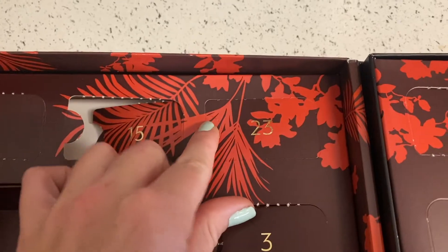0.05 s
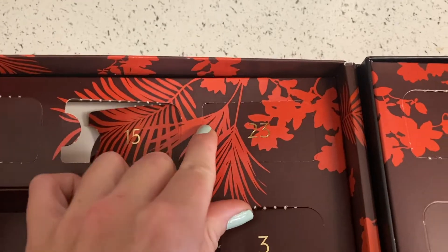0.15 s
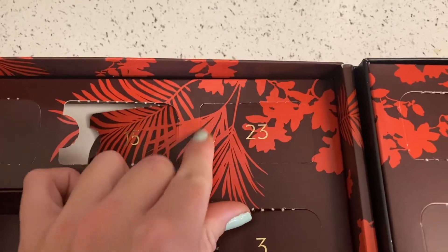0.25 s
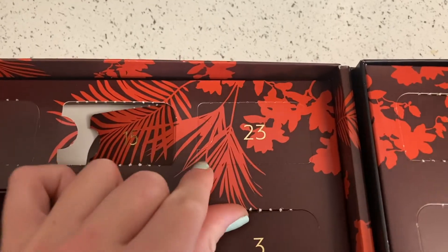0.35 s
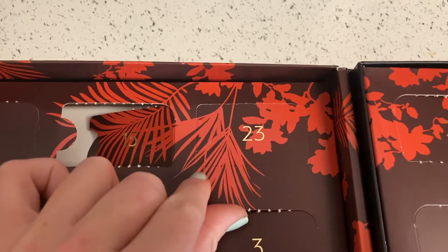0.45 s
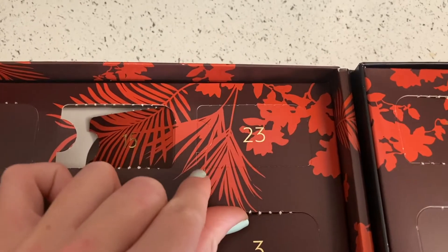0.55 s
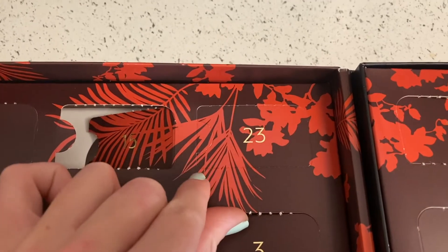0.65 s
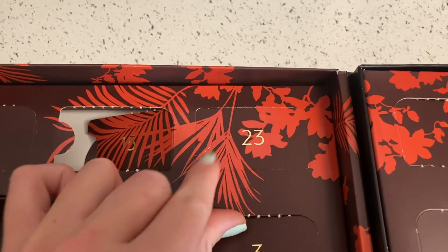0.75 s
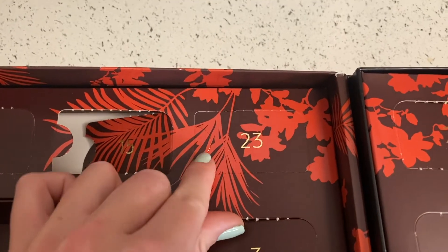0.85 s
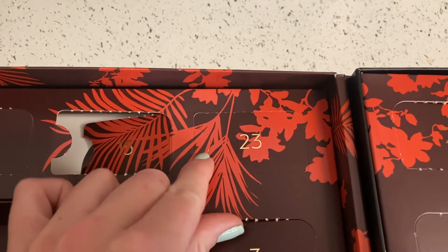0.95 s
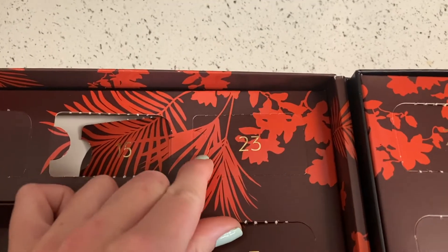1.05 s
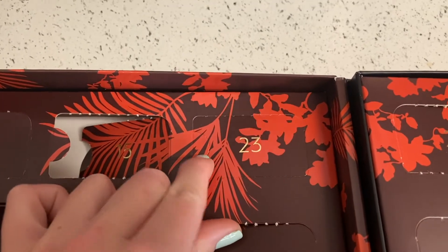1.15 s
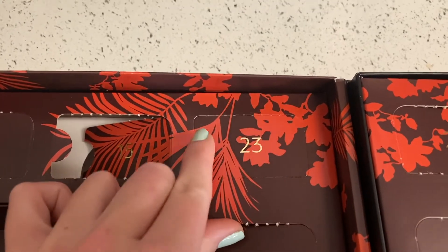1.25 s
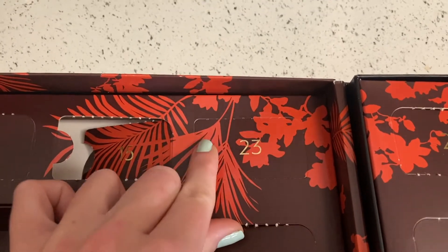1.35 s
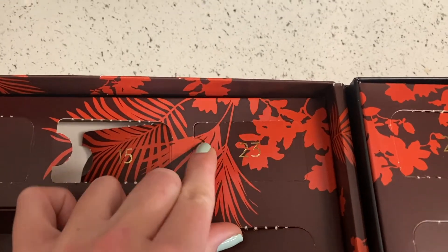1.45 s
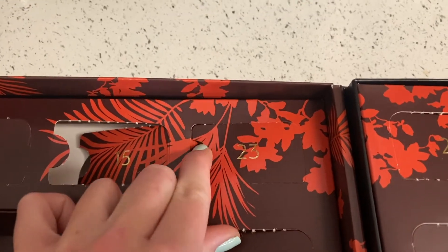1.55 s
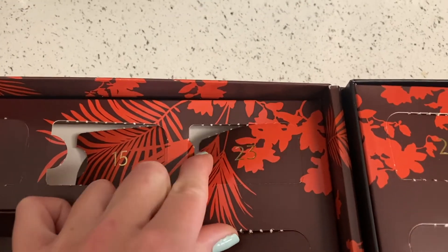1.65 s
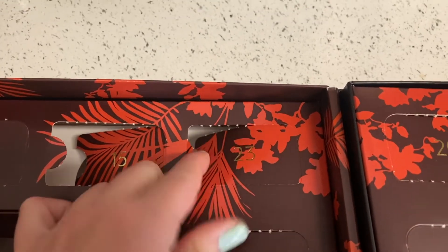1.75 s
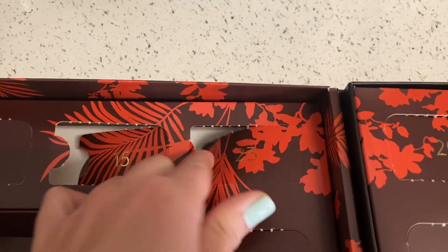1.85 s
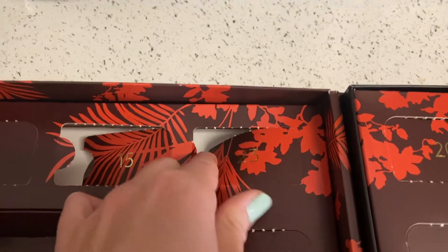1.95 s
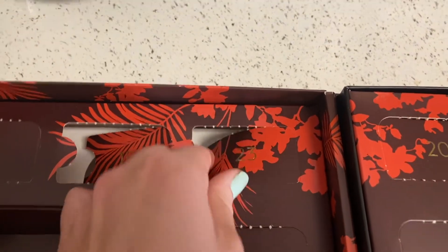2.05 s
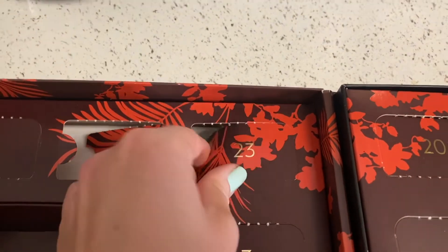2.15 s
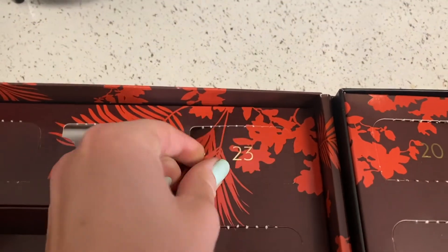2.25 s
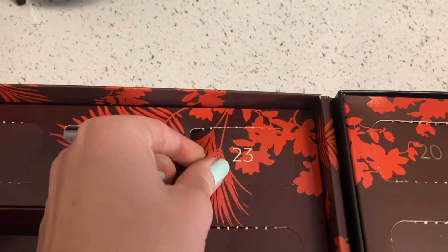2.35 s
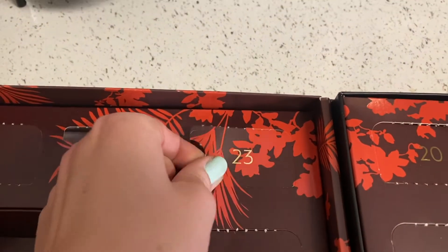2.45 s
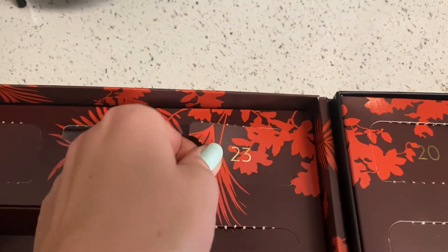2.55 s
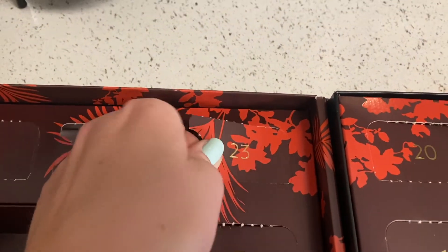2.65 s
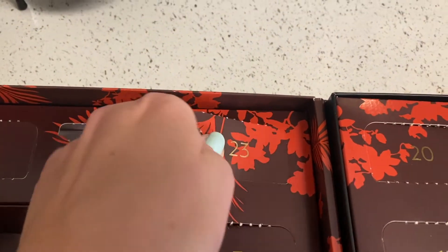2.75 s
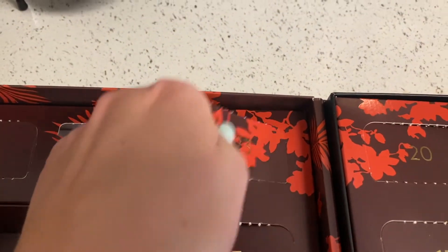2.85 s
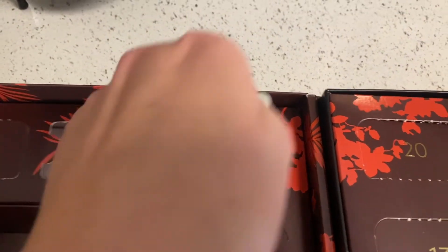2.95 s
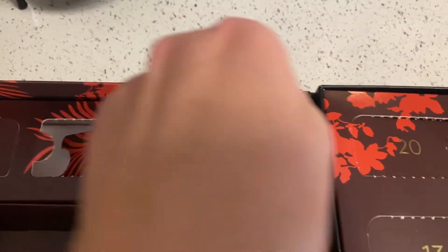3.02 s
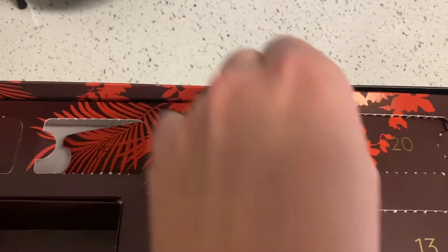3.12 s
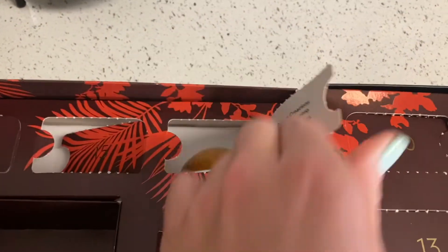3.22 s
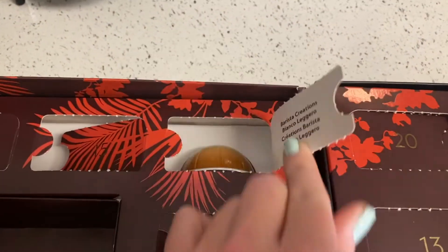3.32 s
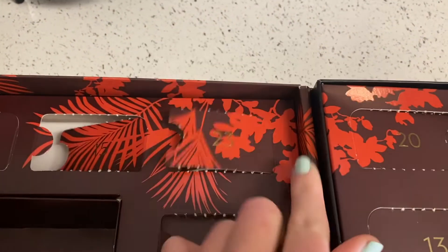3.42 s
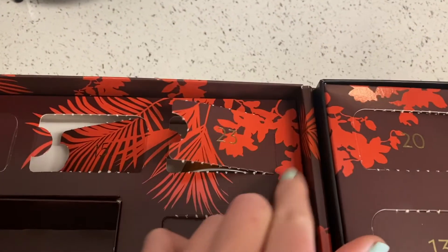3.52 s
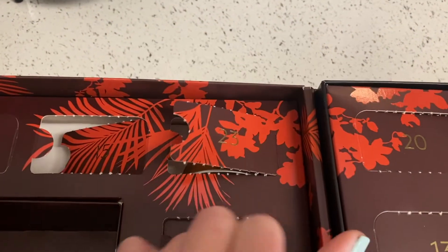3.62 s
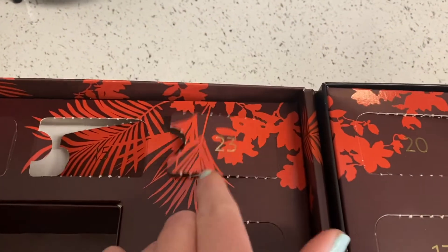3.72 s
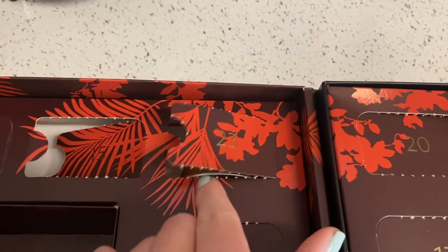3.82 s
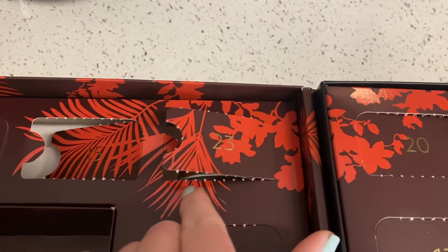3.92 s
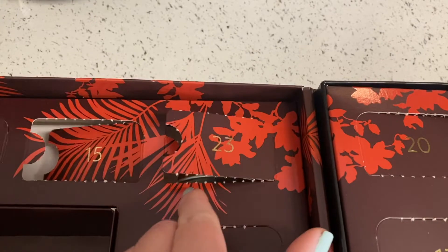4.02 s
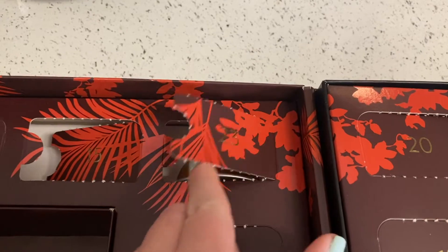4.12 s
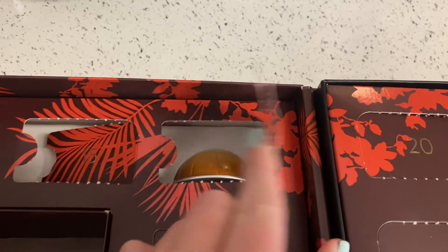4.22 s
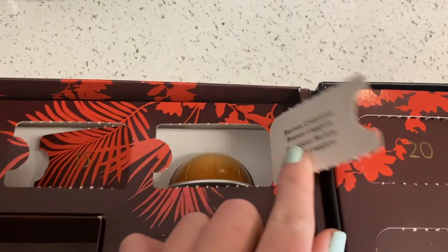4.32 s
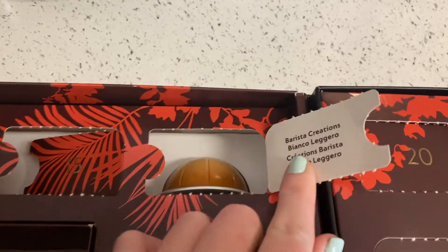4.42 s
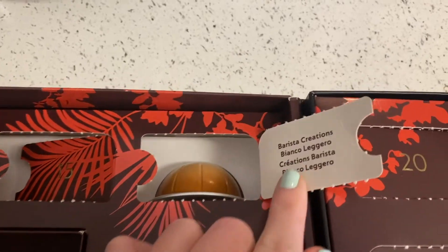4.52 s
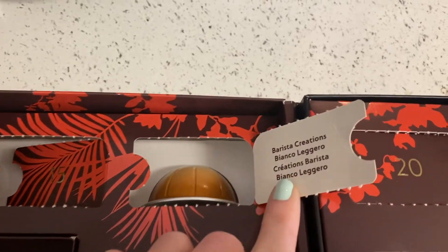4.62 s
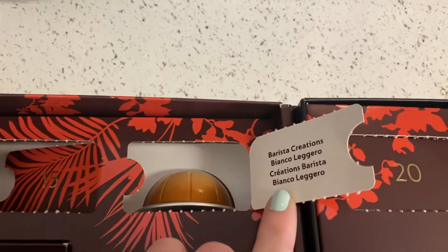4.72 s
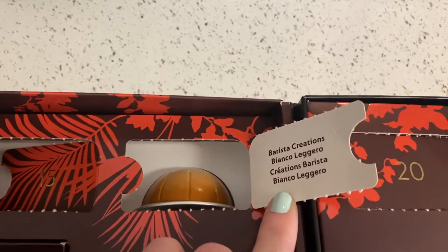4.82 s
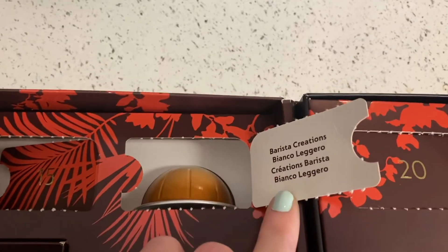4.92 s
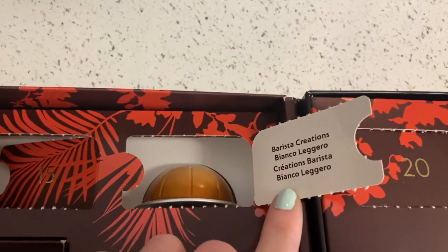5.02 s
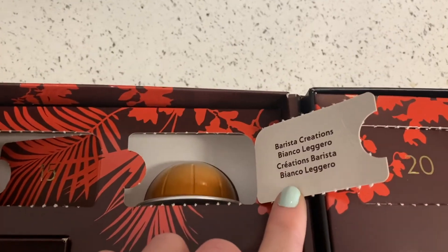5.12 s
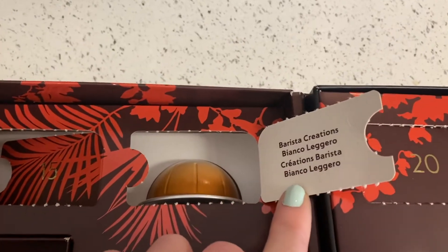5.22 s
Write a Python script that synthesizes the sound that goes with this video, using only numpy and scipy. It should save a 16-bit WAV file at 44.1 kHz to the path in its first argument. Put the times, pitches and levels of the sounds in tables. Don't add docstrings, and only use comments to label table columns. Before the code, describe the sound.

A close stereo phone microphone hears a finger working on a hollow cardboard box on a kitchen counter, over steady soft room air and low fridge hum. From 0 to 1.3 seconds the finger probes: faint skin rub, tiny ticks and muted taps, clearer near 0.2 and 0.8. Around 1.4 and 1.55 the corner is pushed in with bright, sharp cracks and scratchy fibres. Small creaks and crackles continue until 2.4, when the first bridge snaps loudly. More snaps at 2.57 and 2.7 lead into a dense rip from 2.78 to 2.9, dry, boxy and overloaded, with low thumps of the box. A duller knock follows at 3.05. Then the loose flap creaks and scrapes, with a brief high nail squeak near 3.35 and clicks at 3.67 and 4.0. Lighter taps and soft rubbing fade out by about 4.9, leaving the hum. Echo is short.

```python
import sys
import numpy as np
from scipy import signal
from scipy.fft import rfft, irfft, next_fast_len
from scipy.io import wavfile

SR = 44100
rng = np.random.default_rng(int(sys.argv[2]) if len(sys.argv) > 2 else 0)


def transcribe(signal):
    frames = np.atleast_2d(signal).T
    limited = np.clip(frames, -1, 1)
    pcm = np.round(limited * 32767).astype(np.int16)
    wavfile.write(sys.argv[1], SR, pcm)


def invert_db(level):
    return 10 ** (np.asarray(level, dtype=float) / 20)


N = 232495
FAST = next_fast_len(N)

# freq_hz, density_db (per Hz)
KITCHEN_AIR = [(20, -28), (48, -2.5), (86, -18.5), (123, -5), (160, -17.5), (360, -18.5), (600, -26),
               (1200, -27), (1650, -35), (2100, -34.5), (2450, -29.5), (2680, -38), (2800, -42),
               (4000, -44), (11500, -56), (12500, -92)]
# freq_hz, likeness (-1 to 1)
KITCHEN_ALIKE = [(60, 0.63), (290, 0.88), (640, -0.73), (3100, 0.12)]
# pitch_hz, level_db
FRIDGE_HUM = [
    (59.2, -61.5),
    (118.4, -73.5),
    (376.8, -72),
]
KITCHEN_DB = -54.5
ROOM_T60_S, ROOM_DB, ROOM_TOP_HZ = 0.21, -14, 4840

# freq_hz, left_lead_rad
PORT_PHASE = [(30, 0), (120, .4), (430, .9), (780, .3), (2070, .4), (3100, 1.4), (7240, -.8), (9470, -4.6),
              (12500, -8.5), (15900, -12.8)]
# freq_hz, left_minus_right_db
PORT_BALANCE = [(60, -1.5), (110, 1.5), (200, 1), (380, 3), (700, 8.5), (1290, 3.5), (2380, 3.5),
                (4400, 4.5), (8120, 0), (15000, 0)]
# freq_hz, level_db
PORT_DIPS = [(20, -18), (55, 1), (7800, -1), (8300, -4.5), (8800, 7.5), (9100, -2), (12200, -4),
             (12700, -3), (14100, -1), (14600, -7), (15900, 0.5), (16300, -42.5)]

# pitch_hz, level_db
PANELS = [(205, -4.5), (245, -9), (289, 9.5), (357, 3), (398, -8), (472, 6), (544, 8), (610, -1.5),
          (676, 1), (758, 3), (830, 2), (950, 5.5), (1110, -6), (1266, 7), (1400, 1.5), (1520, -9.5),
          (1760, -7), (1950, -1), (2050, 2.5), (2300, -21), (2550, -2), (2760, -17.5), (3000, 4),
          (3350, -13.5), (3750, -7), (4150, -1), (4600, -29)]
# pitch_hz, level_db, t60_s
BOX = [(57.5, -9, 0.12), (71.4, -9.5, 0.24), (89.9, 6, 0.11), (110, 8, 0.043), (121.7, -0.5, 0.12),
       (162, -4, 0.037)]
# freq_hz, density_db (per Hz)
COARSE_FIBRES = [(880, -29), (1500, 0.5), (1700, -7), (2090, 0.5), (3430, -3.5), (4260, -8), (4970, -9.5),
                 (7500, -27.5), (9750, -47), (16500, -120)]
# freq_hz, density_db (per Hz)
FINE_FIBRES = [(3820, -12.5), (6500, -7.5), (10400, -8), (13400, -10.5), (15000, -6.5), (16200, -24.5)]

# start_s, length_s, creak_db, hiss_db, change_db (over the stroke)
STROKES = [(0., 0.22, -54, -63.5, -10), (0.21, 0.075, -47, -49, 1), (0.3, 0.19, -57.5, -76, -17.5),
           (0.785, 0.11, -60, -85, 3), (0.882, 0.15, -50, -63, 1.5), (1.107, 0.2, -54, -75, 0.5),
           (1.347, 0.088, -48.5, -48.5, 2.5), (1.408, 0.082, -40, -40.5, -13),
           (1.518, 0.5, -46.5, -48.5, -3), (1.992, 0.22, -57.5, -61, 13.5), (2.235, 0.16, -64, -66, 13),
           (2.424, 0.2, -57, -62, 25.5), (2.573, 0.18, -40.5, -46, 2.5), (2.79, 0.24, -33.5, -37.5, -10.5),
           (3.05, 0.16, -43, -43, -12.5), (3.247, 0.22, -45.5, -50, -6.5), (3.494, 0.13, -50.5, -56, -15.5),
           (3.673, 0.13, -42, -51, -22.5), (3.839, 0.08, -54, -57.5, -8), (3.944, 0.22, -50, -52.5, -8.5),
           (4.248, 0.052, -50.5, -52, -6), (4.322, 0.11, -59, -63.5, 0.5), (4.463, 0.12, -54, -67, -12),
           (4.616, 0.27, -60.5, -79, -18)]
STROKE_ATTACK_S, STROKE_RELEASE_S = 0.015, 0.013
FINE_DB, FINE_SLOPE = -66.5, 0.6
RUMBLE_DB, RUMBLE_SLOPE = -54.5, 0.68
# time_s, level_db
SQUEAK = [
    (3.24, -59),
    (3.26, -49),
    (3.32, -59),
    (3.35, -32),
    (3.37, -48.5),
    (3.42, -105.5),
]
SQUEAK_HZ, SQUEAK_WIDTH_HZ = 3400, 150
# start_s, length_s, level_db, centre_hz, width_hz
SWISHES = [(1.6, .011, -48.5, 1380, 400), (3.672, 0.046, -54, 2040, 1300), (1.572, .02, -40.5, 5040, 4000),
           (3.76, 0.018, -50.5, 1140, 650), (3.5, 0.053, -53, 2500, 3000), (4.045, 0.018, -48, 3700, 4600),
           (4.243, 0.032, -50.5, 2900, 1900), (4.788, 0.166, -74, 5410, 1000),
           (4.797, 0.14, -72, 2470, 500), (0.78, 0.096, -54, 1260, 220), (1.955, 0.014, -47.5, 4120, 640),
           (3.1, .03, -55, 2070, 770), (3.511, .047, -55.5, 12800, 10000),
           (2.613, .024, -48.5, 10500, 8600), (3.683, 0.013, -49, 1900, 3500)]

# start_s, peak_db, pitch_hz, t60_s
KNOCKS = [(0.785, -31.5, 940, 0.034), (0.913, -41.5, 108, 0.25), (1.104, -34.5, 1320, 0.021),
          (1.177, -35.5, 79.8, 0.26), (1.295, -36.5, 84.5, 0.072), (2.42, -4.5, 1910, .007),
          (2.422, -12.5, 3140, 0.0046), (2.4202, -6, 1380, 0.011), (2.43, -12.5, 448, 0.029),
          (2.43, -16, 1930, .012), (2.443, -19, 4960, .004), (2.697, -12, 1920, .012),
          (3.264, -30.5, 876, .025), (3.285, -29, 285, 0.11), (3.379, -28.5, 93, 0.19),
          (3.393, -23, 605, 0.0062), (1.409, -17.5, 1360, 0.011), (1.4085, -13, 4420, 0.01),
          (1.417, -23.5, 1600, 0.0062), (1.557, -9.5, 1400, 0.0088), (2.7815, -3, 590, 0.048),
          (2.817, -5, 513, .025), (2.841, -12.5, 544, .02), (2.833, -13, 2100, .016),
          (2.8488, -7.5, 1240, .01), (2.877, -10, 2340, 0.0078), (2.88, -12, 980, 0.012),
          (3.0574, -11, 293.5, 0.045), (3.091, -20.5, 294, 0.07), (3.116, -30.5, 312.4, 0.17),
          (3.668, -27.5, 2200, 0.0047), (3.975, -35, 3300, 0.0069), (4.002, -21.5, 3280, 0.0034),
          (4.322, -33, 3020, 0.0027), (4.324, -23, 3620, 0.0025), (4.323, -37, 4940, .003),
          (4.332, -44, 3140, .008),
          (1.35, -36, 1380, .017), (1.396, -34, 4200, .003), (1.402, -27.5, 513, 0.023),
         (1.4145, -16.5, 1410, 0.016), (1.4155, -16, 4600, .003), (1.549, -16, 1510, 0.017),
         (1.5525, -9, 1400, 0.0067), (1.5565, -7, 2100, 0.007), (2.6975, -6.5, 2100, .01),
         (2.701, -10.5, 630, 0.019), (3.056, -22, 648, 0.034), (3.059, -21.5, 474, .04),
         (3.35, -28, 4180, .0033), (3.66, -34.5, 760, .015), (3.6685, -31.5, 735, 0.014),
         (3.676, -33, 2090, .009), (3.716, -39, 1670, .012), (3.755, -36, 490, 0.024),
         (3.766, -41, 1300, 0.018), (3.77, -38, 500, .025), (4.252, -32.5, 289, 0.12)]
# start_s, peak_db, start_hz, end_hz, t60_s
SWEEPS = [(.2125, -17.5, 1534, 310, 0.013), (.782, -32, 1378, 316, 0.035), (1.155, -27.5, 912, 270, 0.096),
          (1.254, -30, 903, 300, 0.0088), (1.822, -22, 1660, 480, 0.046), (1.861, -31.5, 1514, 297, 0.1),
          (1.935, -27.5, 880, 466, 0.036), (2.4205, -5, 764, 383, 0.021), (2.574, -13.5, 594, 280, 0.058),
          (2.572, -6.5, 1090, 740, 0.016), (2.6795, -6.5, 917, 476, 0.02), (2.694, -7.5, 990, 500, 0.04),
          (2.8, -3, 905, 560, .032), (2.809, -3, 1050, 520, .028), (2.8265, 0, 1000, 560, .02),
          (3.057, -19, 259.3, 125, 0.14), (4.002, -30, 1190, 400, 0.023), (4.183, -28, 940, 228, 0.078),
          (4.239, -43, 790, 299, 0.038), (4.471, -45.5, 905, 294, 0.031)]
KNOCK_RISE_CYCLES, KNOCK_SAG = 0.68, 0.037
SWEEP_CYCLES = 1.1

# start_s, peak_db
THUMPS = [(0.219, -39), (0.783, -50), (1.166, -32.5), (1.261, -47), (1.29, -37.5), (1.559, -31.5),
          (1.711, -41), (1.869, -34.5), (2.155, -43.5), (2.422, -41), (2.574, -42), (2.638, -27.5),
          (2.691, -22), (2.796, -22.5), (2.828, -25.5), (2.887, -20),
          (3.052, -22.5), (3.089, -29), (3.245, -34), (3.289, -28), (3.357, -23), (3.38, -28.5),
               (3.487, -51.5), (3.679, -29), (3.852, -43), (3.968, -42), (4.013, -31), (4.198, -34.5),
               (4.249, -33), (4.317, -38.5), (4.475, -32), (4.642, -33), (4.72, -41), (4.757, -37),
               (4.802, -36)]
# start_s, crack_db
TICKS = [(.149, -56), (.888, -64), (.912, -55), (.945, -58), (.96, -43.5), (1.017, -46), (1.034, -42.5),
         (2.368, -43.5), (3.72, -46), (3.764, -42), (1.353, -34.5), (1.367, -37), (1.397, -40.5),
         (1.402, -42.5), (1.521, -48.5), (1.597, -33.5), (2.38, -48.5), (2.549, -36.5), (2.634, -37),
         (2.675, -29), (1.571, -28), (1.579, -32.5), (1.586, -34.5), (1.603, -39.5), (1.24, -50),
         (1.222, -54), (1.0095, -43), (1.811, -41.5), (2.323, -51), (3.875, -50), (1.536, -42),
         (3.511, -46), (3.6679, -35), (3.694, -45.5), (4.057, -50), (4.237, -48), (3.822, -53),
         (3.852, -41.5), (3.886, -53.5), (3.937, -42), (3.973, -46), (4.288, -61), (4.824, -58)]
# start_s, panel_peak_db, panel_colour_hz, crack_db, panel_t60_s
FLICKS = [(0.213, -30, 1250, -56, 0.035), (1.545, -40, 2400, -18.5, 0.063), (2.421, -10.5, 435, -40, 0.028),
          (2.42, -7.5, 1520, -18, 0.033), (2.699, -7.5, 2000, -47, 0.056), (3.052, -25, 210, -40, 0.06),
          (3.055, -31.5, 570, -35, 0.048), (3.085, -23, 550, -52, 0.028), (3.078, -19.5, 3070, -48, 0.021),
          (3.351, -14, 3600, -33, 0.051), (3.674, -37.5, 1575, -52, 0.061),
          (3.686, -40, 1150, -53.5, 0.094), (4.183, -32, 1240, -52, 0.0094), (2.78, -5, 2250, -31, 0.09),
          (2.826, 3, 2280, -33, 0.021), (4.324, -30, 4000, -51, 0.019)]
TICK_FINE_DB, FLICK_FINE_DB = -0.5, -13.5

# start_s, panel_peak_db, panel_colour_hz, crack_db, fine_crack_db
PROBE = [(0.075, -76, 280, -39.5, -51), (0.166, -36.5, 1170, -54, -72), (0.213, -20.5, 390, -38, -58),
         (0.352, -37.5, 1050, -47.5, -80), (0.606, -43.5, 1330, -61, -84),
         (0.782, -29.5, 560, -36.5, -42.5), (0.93, -42, 929, -55, -52), (0.986, -37, 900, -49, -52),
         (1.004, -33.5, 610, -38, -42), (1.106, -29.5, 1170, -37.5, -57), (1.156, -27, 348, -35.5, -47.5),
         (1.23, -33, 740, -43.5, -71), (1.241, -28.5, 825, -64, -67), (1.254, -30, 318, -38, -44)]
# start_s, panel_peak_db, panel_colour_hz, crack_db, fine_crack_db
PUSH = [(1.342, -42.5, 1300, -52, -52), (1.38, -31, 1350, -35, -34.5), (1.408, -20.5, 1370, -21.5, -24.5),
        (1.415, -21.5, 600, -29, -31), (1.54, -28.5, 1474, -23, -32), (1.548, -12, 1380, -19.5, -18),
        (1.552, -7, 1140, -20.5, -23.5), (1.559, -14, 743, -43, -56), (1.572, -31.5, 934, -35, -37),
        (1.716, -32.5, 654, -39.5, -44.5), (1.751, -36.5, 361, -50, -77), (1.798, -32.5, 490, -36, -32.5),
        (1.8225, -20.5, 607, -35, -30), (1.86, -34, 1310, -31.5, -35.5), (1.873, -34.5, 564, -45, -49),
        (1.909, -39, 1780, -29, -61), (1.935, -29.5, 524, -60, -66), (1.954, -33, 690, -39, -48),
        (2.072, -35, 503, -62, -68), (2.107, -40, 493, -65, -70), (2.148, -40.5, 460, -42.5, -54),
        (2.176, -31, 297, -38, -43), (2.286, -40, 830, -49, -57), (2.359, -36, 695, -44, -65)]
# start_s, panel_peak_db, panel_colour_hz, crack_db, fine_crack_db
TEAR = [
    (2.411, -33.5, 862, -43.5, -30),
    (2.42, -19, 897, -19, -35.5),
    (2.431, -18.5, 469, -34, -38.5),
    (2.445, -24.5, 480, -34.5, -25),
    (2.572, -12.5, 810, -17, -23),
    (2.607, -26, 306.4, -28.5, -42),
    (2.634, -22.5, 520, -56, -44.5),
    (2.656, -22.5, 551, -42.5, -41),
    (2.68, -9, 588, -12.5, -23.5),
]
# start_s, panel_peak_db, panel_colour_hz, crack_db, fine_crack_db
RIP = [
    (2.694, -9, 605, -5.5, -21),
    (2.781, -6.5, 618.4, -11, -21.5),
    (2.8, -6.5, 602, -12, -17.5),
    (2.809, -8, 791, -11.5, -33.5),
    (2.826, -15, 703, -16.5, -13.5),
    (2.834, -8.5, 541, -11, -31.5),
    (2.85, -6.5, 503, -17.5, -34),
    (2.878, -5, 798, -11.5, -20),
]
# start_s, panel_peak_db, panel_colour_hz, crack_db, fine_crack_db
FLAP = [(3.08, -46, 298.5, -38, -39), (3.252, -29, 684, -41.5, -49), (3.264, -23.5, 425, -38.5, -50),
        (3.353, -23.5, 590, -44, -32.5), (3.393, -31, 520, -39, -45), (3.489, -37.5, 323, -69, -74),
        (3.554, -48, 900, -46.5, -64), (3.664, -28.5, 345, -54, -61.5), (3.754, -45, 473, -48, -58),
        (3.843, -46, 280, -43, -58), (3.97, -35, 640, -44, -48.5)]
# start_s, panel_peak_db, panel_colour_hz, crack_db, fine_crack_db
HOLD = [(4.002, -26, 537, -28.5, -43.5), (4.044, -35, 510, -52, -48), (4.183, -30, 396, -49.5, -61),
        (4.24, -34, 400, -51.5, -62), (4.322, -41.5, 926, -62, -44), (4.471, -37, 461, -33.5, -52),
        (4.638, -35, 291.5, -36.5, -56.5), (4.717, -42, 312, -42.5, -64), (4.75, -40, 464, -41.5, -56.5),
        (4.77, -42.5, 474, -46.5, -60), (4.791, -42.5, 330, -43, -78)]
PROBE_T60_S, PUSH_T60_S, TEAR_T60_S = 0.039, 0.051, 0.059
RIP_T60_S, FLAP_T60_S, HOLD_T60_S = 0.052, 0.086, 0.055


def on_bins(table):
    hz, value = np.transpose(table)
    bins_hz = np.fft.rfftfreq(FAST, 1 / SR)
    return np.interp(np.log(bins_hz + 1), np.log(hz + 1), value)


def unit(x):
    return x / np.sqrt(np.mean(x ** 2))


def colour(x, table):
    return unit(irfft(rfft(x, FAST) * invert_db(on_bins(table)), FAST)[:, :N])


def pair(alike, size):
    mid, side = rng.standard_normal((2, size))
    return np.sqrt((1 + alike) / 2) * mid + np.sqrt((1 - alike) / 2) * side * np.array([[1], [-1]])


def halves(x, hz):
    return [signal.sosfilt(signal.butter(2, hz, kind, fs=SR, output="sos"), x) for kind in ("low", "high")]


def add(out, s, x):
    i = int((s + 0.001253) * SR)
    out[:, i:i + x.shape[1]] += x[:, :N - i]


def kitchen():
    alike = np.clip(on_bins(KITCHEN_ALIKE), -.95, .95)
    mid, side = rfft(rng.standard_normal((2, FAST)))
    air = np.sqrt(1 + alike) * mid + np.sqrt(1 - alike) * side * np.array([[1], [-1]])
    t = np.arange(N) / SR
    hum = sum(np.sqrt(2) * invert_db(db) * np.sin(2 * np.pi * hz * t) for hz, db in FRIDGE_HUM)
    return invert_db(KITCHEN_DB) * colour(irfft(air, FAST), KITCHEN_AIR) + hum


def room(x):
    t = np.arange(int(.5 * SR)) / SR
    decay = np.exp(-np.log(1000) * t / ROOM_T60_S) * (t > .004)
    tail = pair(0.42, size=len(t)) * decay
    tail = signal.lfilter(*signal.butter(1, ROOM_TOP_HZ, fs=SR), tail)
    tail = tail / np.sqrt(np.sum(tail ** 2) / 2)
    return invert_db(ROOM_DB) * signal.fftconvolve(x, tail, axes=1)[:, :N]


def ports(x):
    half = invert_db(on_bins(PORT_BALANCE) / 2) * np.exp(.5j * on_bins(PORT_PHASE))
    return irfft(rfft(x, FAST) * np.array([half, 1 / half]), FAST)[:, :N]


def ring(hz, db, t60, seconds, late, scatter_db, apart):
    count = len(hz)
    hz = hz * (1 + 0.024 * rng.standard_normal(count))
    t = np.maximum(np.arange(int(seconds * SR)) / SR - (0.33 * late / hz)[:, None], 0)
    rise = 1 - np.exp(-(t * hz[:, None] / late) ** 2)
    spin = (2j * np.pi * hz - np.log(1000) / t60)[:, None]
    modes = rise * np.exp((t * spin).astype(np.complex64))
    shared = invert_db(db + scatter_db * rng.standard_normal(count)) * np.exp(.6j * rng.standard_normal(count))
    own = np.exp(apart * (rng.standard_normal((2, count)) * .5 + 1j * rng.standard_normal((2, count))))
    y = ((shared * own) @ modes).imag
    return y / np.abs(y.mean(axis=0)).max()


def touch_shape(t, s, length, attack_s, release_s):
    set_in = (t - s) / attack_s + 1
    lift_off = (s + length - t) / release_s + 1
    return np.clip(np.minimum(set_in, lift_off), 0, 1)


def strokes():
    t, gain = np.arange(N) / SR, 1e-5
    for s, length, creak_db, hiss_db, change_db in STROKES:
        touch = touch_shape(t, s, length, STROKE_ATTACK_S, STROKE_RELEASE_S)
        swell = invert_db(change_db * np.clip((t - s) / length, 0, 1))
        gain = np.maximum(gain, touch * swell * invert_db(np.array([[creak_db], [hiss_db]])))
    return 20 * np.log10(gain)


def swishes(noise):
    t, out = np.arange(N) / SR, 0
    for s, length, db, hz, width_hz in SWISHES:
        touch = touch_shape(t, s, length, .005, .015)
        band = signal.butter(2, [hz - width_hz / 2, hz + width_hz / 2], "band", fs=SR, output="sos")
        out = out + invert_db(db) * touch * unit(signal.sosfilt(band, noise))
    return out


def grains(rate, spread_db, smear_s):
    slips = (rng.random(N) < rate / SR) * invert_db(spread_db * rng.exponential(size=N))
    return unit(signal.lfilter([1], [1, -np.exp(-1 / (smear_s * SR))], slips) + 0.4)


def rub():
    t = np.arange(N) / SR
    panel_db, hiss_db = strokes()
    fine_db = FINE_DB + FINE_SLOPE * (hiss_db + 55.5)
    rumble_db = RUMBLE_DB + RUMBLE_SLOPE * (panel_db + 50.5)
    slips = [grains(600, spread_db=2.8, smear_s=.003) for _ in range(4)]

    hz, db = np.transpose(PANELS)
    panels = [(140, -25), *zip(hz, db - 3.85 * np.log2(hz / 500)), (7000, -60)]
    box_hz, box_db, box_t60 = np.transpose(BOX)
    box = ring(box_hz, box_db, 0.41 * box_t60, .25, late=0.96, scatter_db=-4.5, apart=0.13)
    creak = colour(slips[0] * pair(0.34, size=N), panels)
    rumble = unit(signal.fftconvolve(pair(1.0, size=N), box, axes=1)[:, :N])

    coarse, middle = halves(colour(pair(0.084, size=N), COARSE_FIBRES), 2400)
    fine = colour(pair(0.37, size=N), FINE_FIBRES)
    hiss = invert_db(hiss_db + 3.0) * (slips[1] * coarse + slips[2] * middle)
    hiss = hiss + invert_db(fine_db + 8.0) * slips[3] * fine

    skin = pair(0.2, size=N)
    squeak = unit(signal.lfilter(*signal.iirpeak(SQUEAK_HZ, SQUEAK_HZ / SQUEAK_WIDTH_HZ, SR), skin))
    squeak_gain = invert_db(np.interp(t, *np.transpose(SQUEAK), left=-np.inf))
    squeak = squeak_gain * slips[2] * squeak
    return invert_db(panel_db + 1.5) * creak + hiss + squeak + invert_db(rumble_db) * rumble + slips[1] * swishes(skin)


def struck(cycles, t, t60):
    shape = (1 - np.exp(-(cycles / KNOCK_RISE_CYCLES) ** 2)) * invert_db(-60 * t / t60)
    return (shape * np.sin(2 * np.pi * cycles))[None] / shape.max()


def knocks():
    out, t = np.zeros((2, N)), np.arange(int(.3 * SR)) / SR
    for s, peak_db, hz, t60 in KNOCKS:
        t60 = min(t60, 900 / hz ** 1.5)
        sag = KNOCK_SAG * t60 / 4 * (1 - np.exp(-4 * t / t60))
        add(out, s, invert_db(peak_db) * struck(hz * (t + sag), t, t60))
    for s, peak_db, start_hz, end_hz, t60 in SWEEPS:
        fall_s = SWEEP_CYCLES / end_hz
        cycles = end_hz * t + (start_hz - end_hz) * fall_s * (1 - np.exp(-t / fall_s))
        add(out, s, invert_db(peak_db) * struck(cycles, t, t60))
    return out


def snaps():
    body, fibres = np.zeros((2, N)), np.zeros((2, N))
    hz, db = np.transpose(PANELS)
    box_hz, box_db, box_t60 = np.transpose(BOX)

    lead_s = .008
    t = np.arange(int(.07 * SR)) / SR - lead_s
    after = np.maximum(t, 0)
    burst = (1 - np.exp(-after / 0.00052)) * (np.exp(-after / 0.0013) + 0.12 * np.exp(-after / 0.011))
    burst += 0.025 * np.exp(-np.abs(t) / 0.0079)

    stages = ((PROBE, PROBE_T60_S), (PUSH, PUSH_T60_S), (TEAR, TEAR_T60_S),
              (RIP, RIP_T60_S), (FLAP, FLAP_T60_S), (HOLD, HOLD_T60_S))
    bridges = [(*row, t60) for rows, t60 in stages for row in rows]
    flicks = [(*row, row[-1] + FLICK_FINE_DB, t60) for *row, t60 in FLICKS]
    for table, above_db, below_db in ((bridges, 5.0, 9.0), (flicks, 14.0, 16.0)):
        for s, peak_db, colour_hz, crack_db, fine_db, t60 in table:
            octaves = np.log2(hz / colour_hz)
            near_db = db - np.where(octaves > 0, above_db, below_db) * octaves ** 2
            t60s = np.clip(t60, .01, .3) * (600 / hz) ** 0.63
            panels = ring(hz, near_db, t60s, 0.16, late=0.69, scatter_db=2.0, apart=.36)
            add(body, s, invert_db(peak_db) * panels)
            add(fibres, s - lead_s, invert_db(np.array([[crack_db + 5.5], [fine_db + 10.0]])) * burst)
    for s, crack_db in TICKS:
        add(fibres, s - lead_s, invert_db(crack_db + np.array([[0], [TICK_FINE_DB]])) * burst)
    for s, peak_db in THUMPS:
        thump = ring(box_hz, box_db, box_t60, 0.21, late=0.77, scatter_db=9.5, apart=0.067)
        add(body, s, invert_db(peak_db) * thump)

    coarse = colour(pair(.7, size=N), COARSE_FIBRES)
    fine = colour(pair(.86, size=N), FINE_FIBRES)
    return body + fibres[0] * coarse + fibres[1] * fine


def scene():
    card, loose = snaps() + rub(), knocks()
    to_room = (card + invert_db(-4.0) * loose).mean(axis=0, keepdims=True)
    return ports(card + loose) + room(to_room) + kitchen()


def top_cut(x):
    return signal.sosfilt(signal.butter(12, 16400, fs=SR, output="sos"), x)


def record(dry):
    heard = irfft(rfft(dry, FAST) * invert_db(on_bins(PORT_DIPS)), FAST)[:, :N]
    mix = np.clip(heard, -.98, .98)
    return top_cut(mix)


dry = scene()
out = record(dry)
transcribe(out)
```